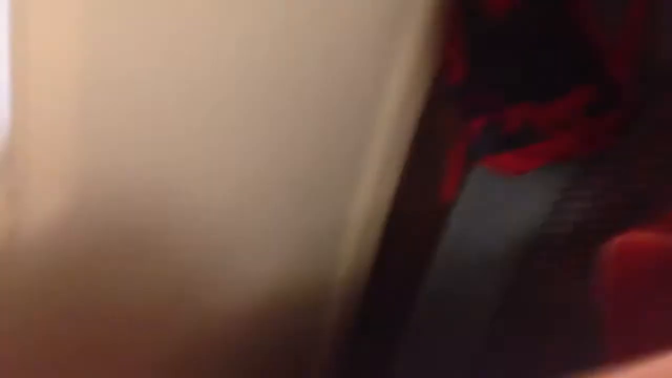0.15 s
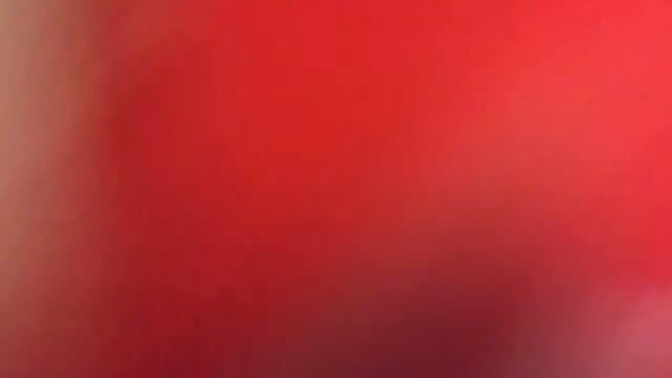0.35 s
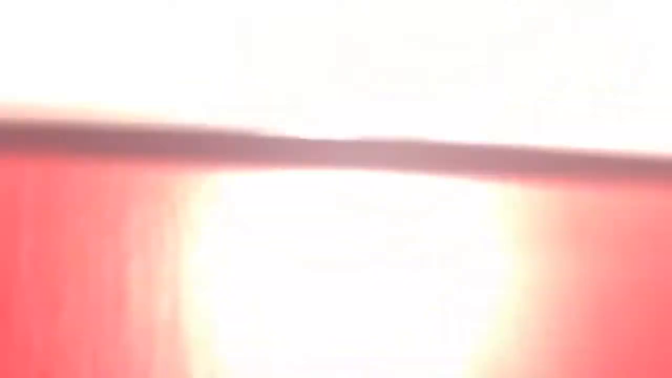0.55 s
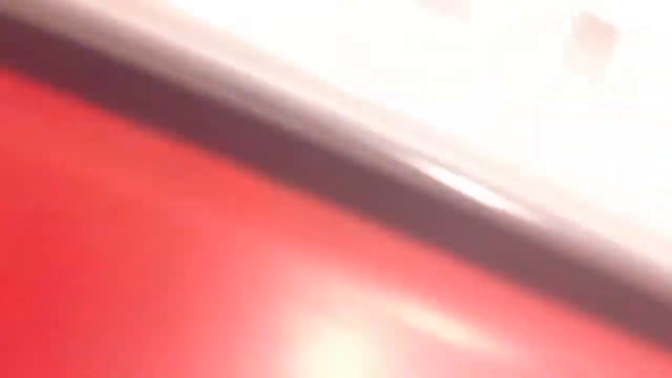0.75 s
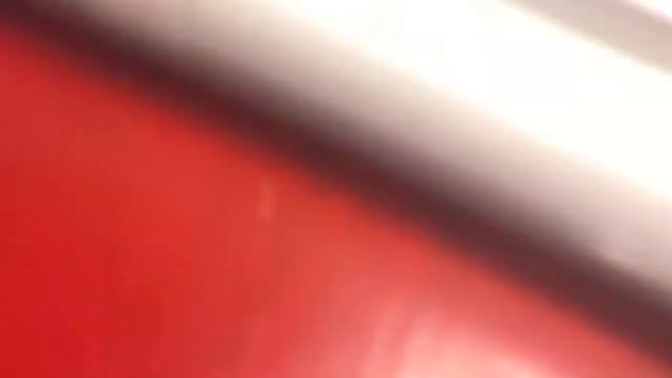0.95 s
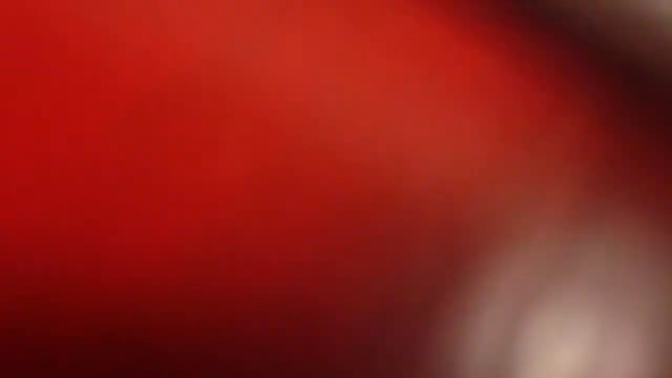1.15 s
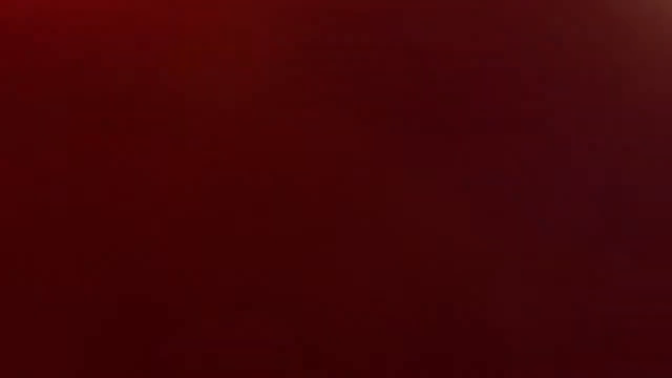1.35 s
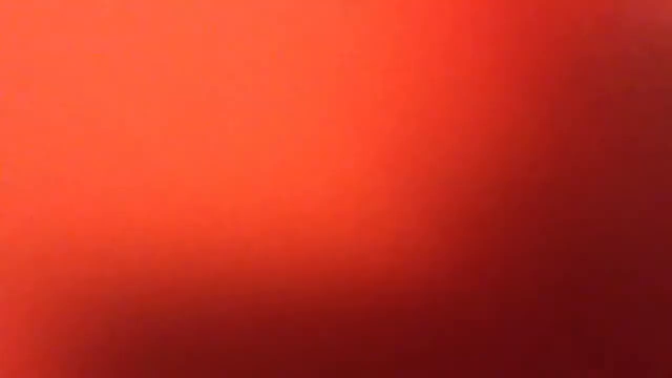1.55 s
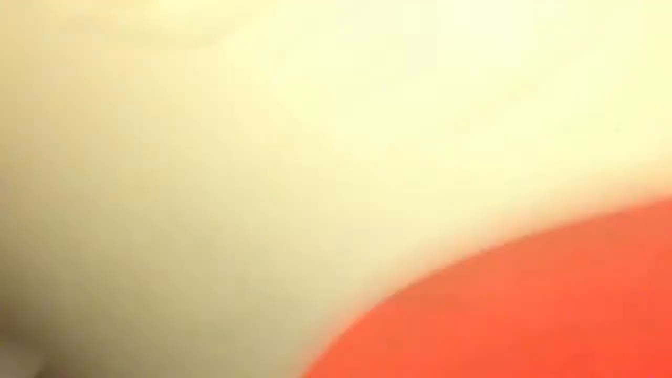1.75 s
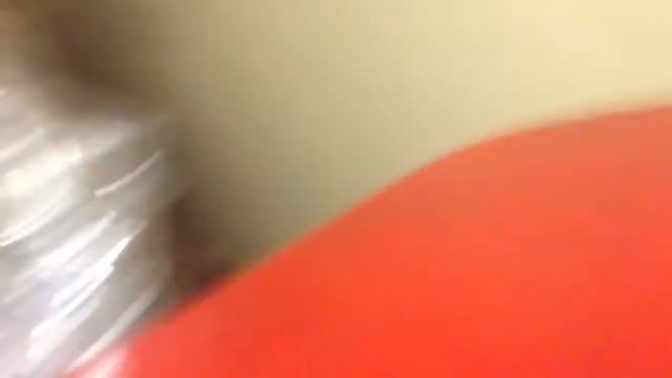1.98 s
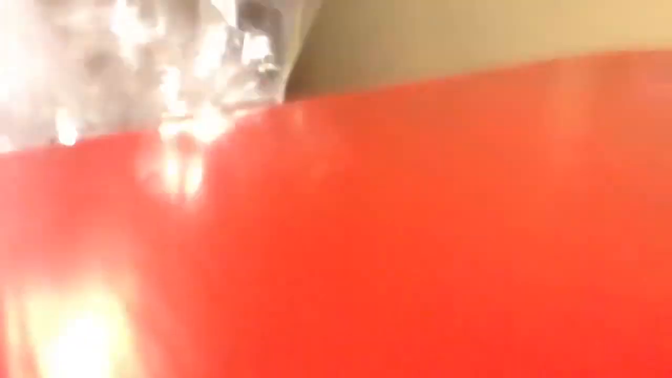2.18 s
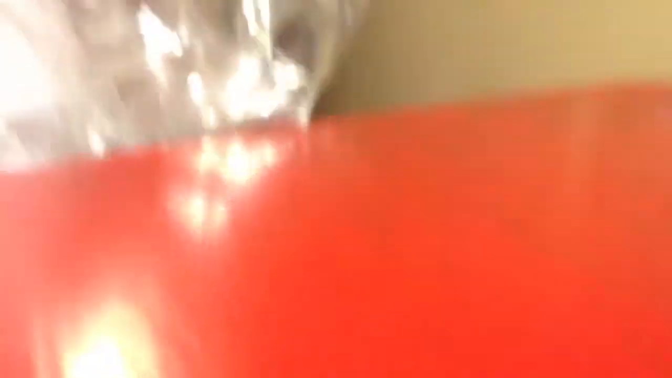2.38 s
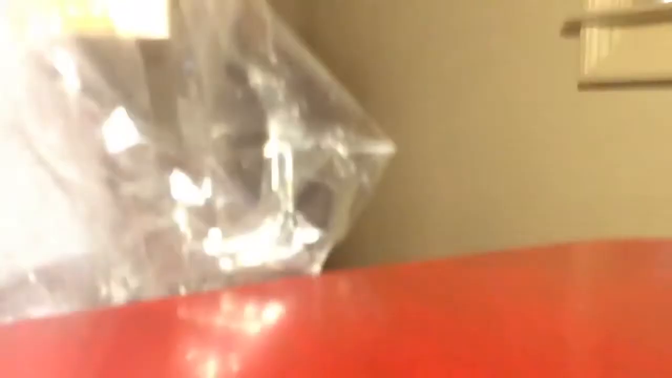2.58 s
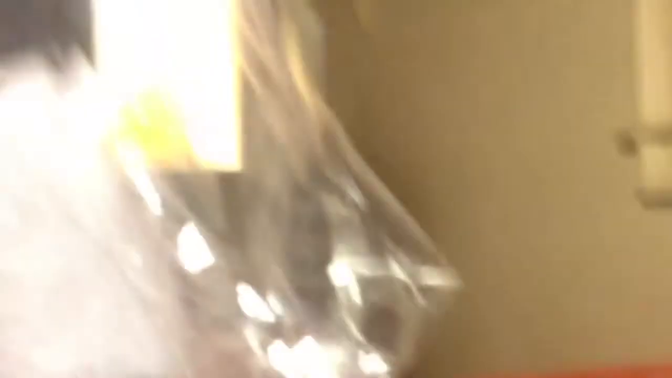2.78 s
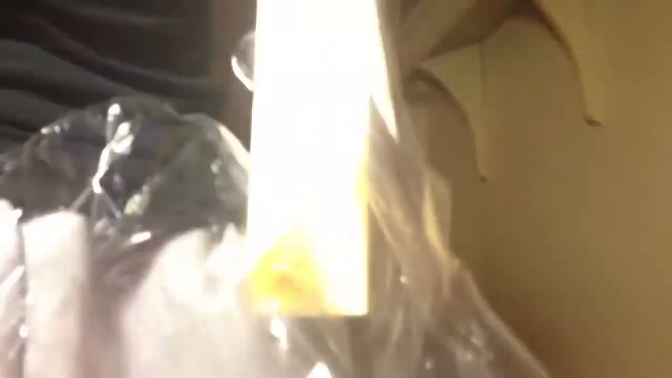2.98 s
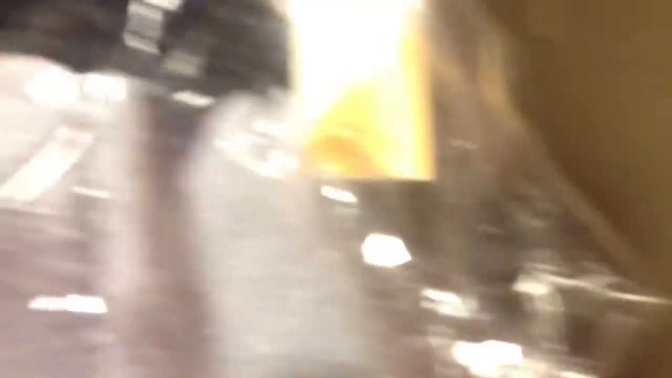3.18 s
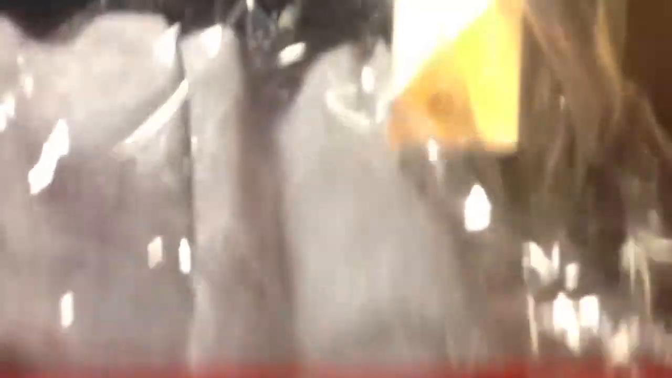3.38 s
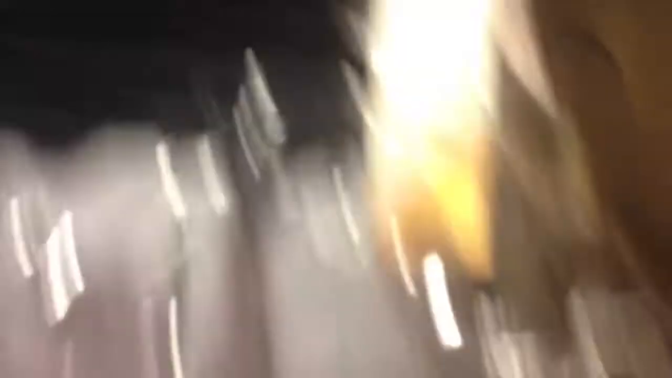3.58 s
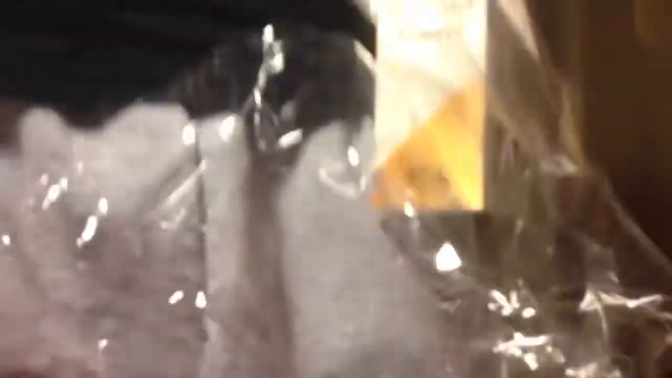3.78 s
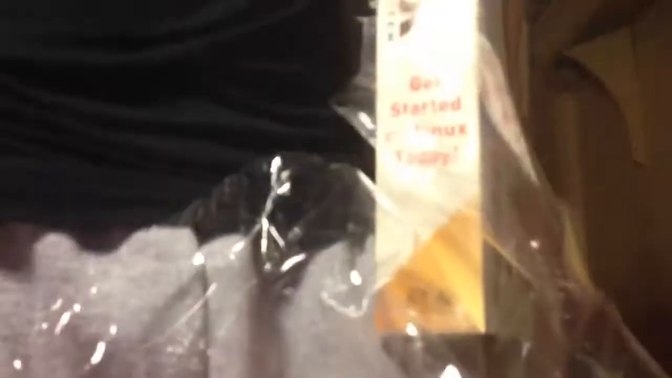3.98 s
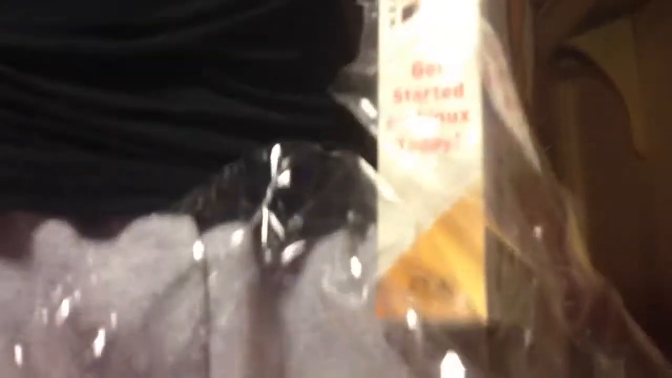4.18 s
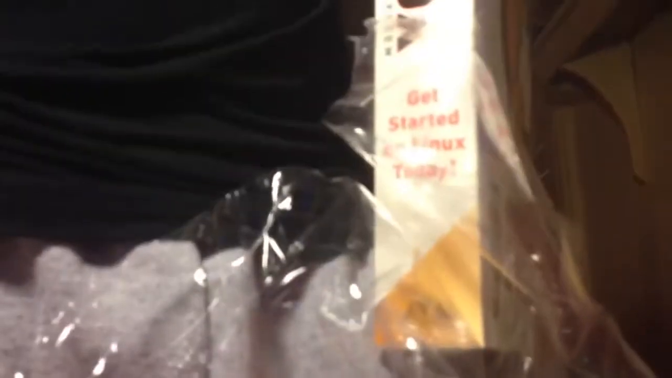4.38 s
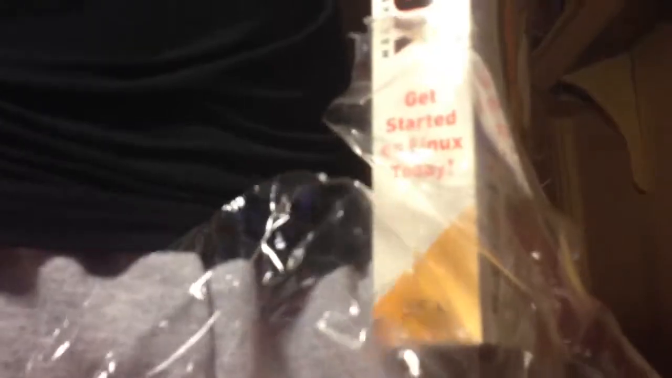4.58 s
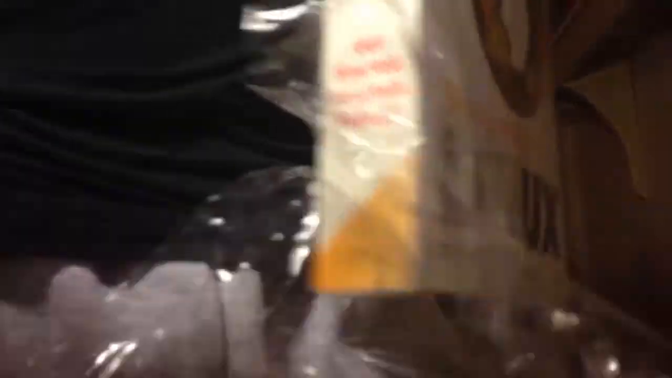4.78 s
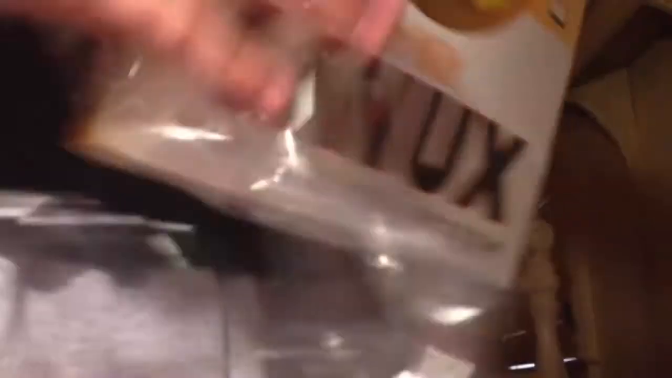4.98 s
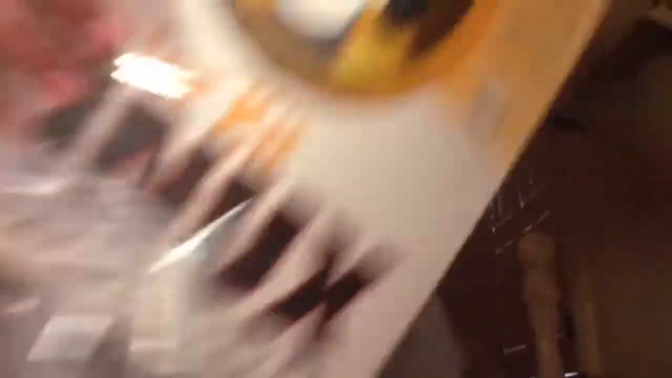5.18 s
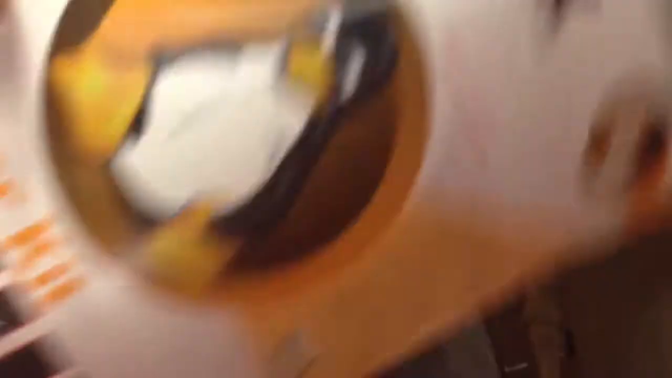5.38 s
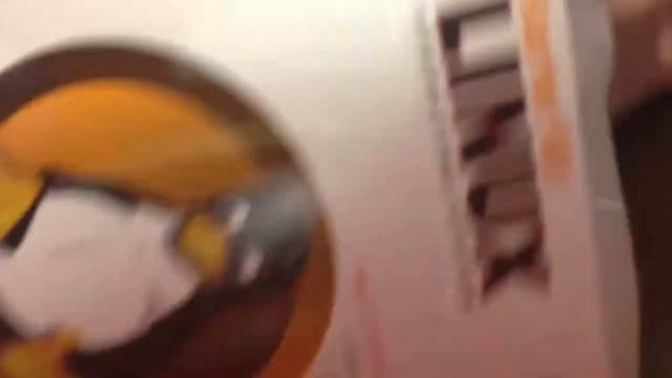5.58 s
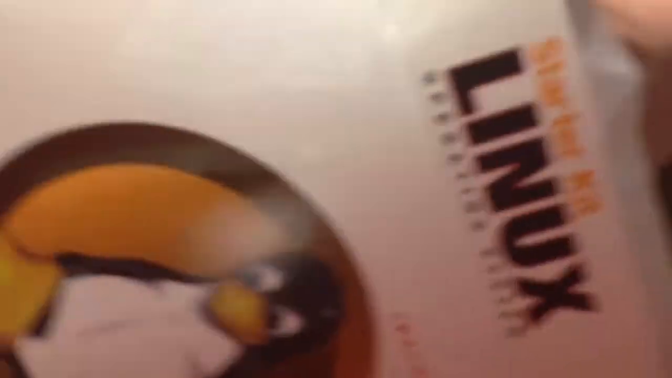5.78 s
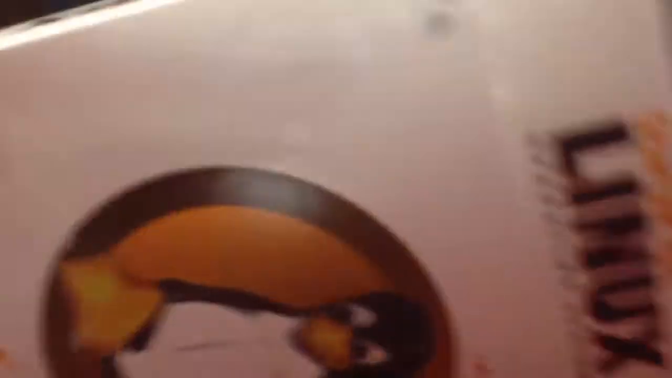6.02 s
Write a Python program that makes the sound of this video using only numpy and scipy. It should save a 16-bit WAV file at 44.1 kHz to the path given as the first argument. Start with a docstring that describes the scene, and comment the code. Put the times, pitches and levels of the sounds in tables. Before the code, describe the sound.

Everything is very close and dry, in a small quiet room with a soft hiss. At 0 s there is a short clack, scrape and hand rub, then faint crinkling and small plastic ticks until 0.9 s. At 1.03 s comes the loudest blow, a hard low knock with a scrape; at 1.33 s a sharp, bright clack of a hard case. A softer bump follows at 1.88 s, then a strong clattering double hit at 2.1-2.2 s, ringing the hollow desk. It stays nearly still with weak taps, a light clack at 2.76 s, and then a tight group of thumps, scrapes and snaps at 3.58-3.93 s. After a quiet gap, plastic wrap starts crinkling at about 4.75 s, bursts strongest at 5.05 s, and keeps snapping and crackling in uneven pulls, with cardboard rubbing and dull bumps near 5.5 s, to the end at 6 s.

```python
"""Hard knocks, clacks and scrapes right at the microphone, then plastic that crinkles and snaps.
A hand-held camera is bumped and set down on a desk: blows swing its case and ring the hollow desk, edges chatter.
Then a cardboard box is pulled out of clear wrap: noise bursts make the snaps, random impulses the sliding.
A small, quiet room answers faintly with decaying noise, over a soft hush."""
import sys
import numpy as np
from scipy import signal
from scipy.fft import rfft, irfft, next_fast_len
from scipy.io import wavfile
from scipy.ndimage import map_coordinates

SR = 44100
rng = np.random.default_rng(int(sys.argv[2]) if len(sys.argv) > 2 else 0)


def wav_out(sig):
    """Save sig, one row per channel (or a flat mono array), as 16-bit PCM at SR to the path in sys.argv[1]."""
    wavfile.write(sys.argv[1], SR, np.round(np.clip(np.atleast_2d(sig).T, -1, 1) * 32767).astype(np.int16))


N = 266805
AGE = np.arange(SR // 4) / SR  # time since a contact [s]

# Blows on case and desk, before the trims in knocks(): (time [s], low thump level [dB], thump pitch [Hz],
# knock level [dB], knock pitch [Hz], loss per rock [dB])
BLOWS = [(0.037, -35.5, 234, -24.5, 473, 13), (1.034, -12.5, 172, -3, 388, 28),
         (1.058, -20, 218.6, -30.5, 642, 15), (1.303, -33.5, 248, -50, 450, 18),
         (1.328, -28, 319, -14.5, 680, 38), (1.376, -39.5, 307, -40, 726, 2),
         (1.481, -37.5, 285, -50, 520, 13), (1.878, -23.5, 178, -37.5, 609, 22),
         (2.109, -35.5, 248, -15, 622, 26), (2.122, -19.5, 280, -23, 520, 9),
         (2.179, -14, 216, -9, 643, 19), (2.217, -31, 174.4, -38, 720, 9),
         (2.465, -59.5, 221, -54.5, 684, 15.5), (2.648, -55.5, 209, -51, 750, 6.5),
         (2.759, -36.5, 236, -33.5, 614, 17), (2.775, -29, 261.5, -39.5, 475, 5),
         (3.02, -36.5, 228, -55.5, 460, 19), (3.316, -61, 232, -55, 694, 13),
         (3.578, -21.5, 220, -21.5, 510, 22), (3.594, -21.5, 226, -26, 570, 7),
         (3.679, -11, 182, -14, 494, 4.5), (3.812, -29.5, 249, -36, 750, 23),
         (3.921, -29, 186, -39.5, 750, 7), (4.282, -40, 145, -58, 710, 19),
         (5.047, -22.5, 218, -39, 875, 8.5), (5.092, -45.5, 220, -31.5, 1235, 20),
         (5.493, -23, 196, -61, 430, 13), (5.56, -23.5, 199, -25, 537, 4.5),
         (5.991, -31.5, 260, -41, 566, 1.5)]


def amp(db):
    """Decibels to gain."""
    return 10 ** (np.asarray(db) / 20)


def unit(x):
    """Scale to rms 1."""
    return x / np.sqrt(np.mean(x ** 2) + 1e-20)


def sized(x, db):
    """Give a hit the energy of one millisecond at this rms level."""
    return x * amp(db) * np.sqrt(SR / 1000 / (np.sum(x ** 2) + 1e-20))


def along(points, hz):
    """Read (Hz, value) points on a log frequency axis."""
    f, v = np.transpose(points)
    return np.interp(np.log(hz + 1), np.log(f + 1), v)


def curves(rows):
    """One level per sample for each column; -120 dB, practically silent, outside the rows."""
    s, *cols = np.transpose(rows)
    return [np.interp(np.arange(N) / SR, s, c, left=-120, right=-120) for c in cols]


def wobble(rate):
    """A smooth random curve with rate knots a second."""
    knots = rng.standard_normal(int(N * rate / SR) + 4)
    return map_coordinates(knots, [np.arange(N) * rate / SR])


def fade(t60):
    """Exponential decay after a contact, falling 60 dB in t60 seconds."""
    return amp(-60 * AGE / t60)


def filtered(x, response):
    """x times a response given as a function of frequency."""
    m = next_fast_len(len(x) + 8192)
    return irfft(rfft(x, m) * response(np.fft.rfftfreq(m, 1 / SR)), m)[:len(x)]


def resonance(f, hz, width):
    """A causal band-pass with peak gain 1."""
    return 1j * f * width / (hz * hz - f * f + 1j * f * width)


def add(track, s, x):
    """Mix x into the track from time s."""
    start = min(max(round(s * SR), 0), N)
    track[start:start + len(x)] += x[:N - start]


def grains(count, rate, spread_db):
    """Random impulses, rate a second: many small ones and a few large, scaled to rms 1."""
    size = amp(spread_db * np.minimum(rng.exponential(size=count), 4))
    struck = rng.random(count) < rate / SR
    return unit(struck * size * rng.choice([-1, 1], count))


def push(hz, rise):
    """A few swings that build up and die away, quicker for a shorter rise [s]."""
    return (AGE / rise) ** 3 * np.exp(-AGE / rise) * np.sin(2 * np.pi * hz * AGE)


def rocking():
    """Four contacts per blow: the first, then ever softer ones with weaker knocks as the object rocks to rest."""
    rock_s, rock_dull_db = .019, 7  # time between contacts [s]; extra loss of the later knocks [dB]
    contacts = []
    for s, thump_db, thump_hz, knock_db, knock_hz, loss_db in BLOWS:
        for k in range(4):
            dull_db = rock_dull_db * (k > 0)
            contacts.append((s + k * rock_s, thump_db - k * loss_db, thump_hz,
                             knock_db - k * loss_db - dull_db, knock_hz))
    return contacts


def knocks():
    """Each contact swings the case for a few cycles, thumps the desk and leaves its hollow ringing."""
    # Modes of the hollow desk and box, before random scatter: (pitch [Hz], relative level [dB], t60 [s])
    desk_modes = [(138, -0.5, 0.14), (168, -4.5, 0.064), (196, -5, 0.3), (236, 2.5, 0.26),
                  (305, -9.5, 0.18), (430, -8.5, 0.16)]
    panel_db, panel_db_per_oct = -9.5, 7.5  # rattle against a 600 Hz knock; higher knocks rattle it more
    out = np.zeros(N)
    for s, thump_db, thump_hz, knock_db, knock_hz in rocking():
        # the swings start a little early, since they take time to build up
        add(out, s - .0022, sized(push(knock_hz, rise=0.00079), knock_db))
        add(out, s - .004, sized(push(thump_hz, rise=.0021), thump_db - 2.5))

        # the touching faces rattle against two broad panel resonances, filling in the middle of the knock
        rattle = grains(len(AGE), rate=3400, spread_db=4.0) * fade(0.022)
        high_panel = filtered(rattle, lambda f: resonance(f, 690, 520) ** 2)
        low_panel = filtered(rattle, lambda f: resonance(f, 370, 150) ** 2)
        high_panel_db = knock_db + panel_db + panel_db_per_oct * np.log2(knock_hz / 600)
        add(out, s, sized(high_panel, high_panel_db))
        add(out, s - .002, sized(low_panel, thump_db - 10.0))

        ring = np.zeros(len(AGE))
        for hz, db, t60 in desk_modes:
            gain = amp(db + rng.normal(0, 3))
            detuned_hz = hz * (1 + .03 * rng.normal())
            ring += gain * fade(t60) * np.sin(2 * np.pi * detuned_hz * AGE)
        # a harder blow presses on the desk and damps it, so the ring grows half as fast in dB
        add(out, s, sized(ring, 0.5 * thump_db - 28.5))
    return out


def case(f, direct):
    """The modes of the plastic case over a share of unringing sound."""
    # Case modes: (pitch [Hz], width [Hz], level [dB])
    case_modes = [(940, 400, 6.5), (1530, 200, -3.5), (1780, 270, -9), (2022, 91, 0), (2560, 150, -12),
                  (2710, 200, -5), (3150, 120, -8), (4210, 160, -9), (4990, 180, -7), (5500, 63, -15.5),
                  (6200, 95, -14.5), (6430, 120, -17.5), (8150, 500, -8.5), (9840, 220, -13)]
    return direct + sum(amp(db) * resonance(f, hz, width) for hz, width, db in case_modes)


def clacks():
    """A hard edge chatters for a few milliseconds and rings the case."""
    # Hard edges meeting: (time [s], level [dB], brightness [Hz])
    edge_hits = [(0.0155, -27, 4770), (0.161, -35, 3950), (1.325, -7.5, 4276), (1.3746, -24, 2630),
                 (1.3796, -23, 2680), (1.8478, -42, 3180), (1.8825, -28, 3570), (2.109, -24.5, 2551),
                 (2.1769, -11.5, 3175), (2.4133, -43, 3780), (2.469, -54, 3200), (2.672, -52.5, 3420),
                 (2.757, -35, 2870), (2.8487, -38.5, 3730), (3.5758, -36.5, 2800), (3.6071, -25, 2390),
                 (3.6774, -20, 4350), (3.694, -25, 3885), (3.813, -35, 4030), (3.9284, -42.5, 4750),
                 (5.4684, -32, 2800), (5.5473, -29.5, 2050), (5.5573, -32.5, 2170)]
    out = np.zeros(N)
    for s, db, hz in edge_hits:
        build_up = 1.1 - fade(0.017)
        decay = fade(0.013) + amp(-31.5) * fade(0.053)
        chatter = grains(len(AGE), rate=20000, spread_db=5.0) * build_up * decay
        clack = filtered(chatter, lambda f: case(f, direct=0.053) * resonance(f, hz, 1.5 * hz) ** 2)
        add(out, s, sized(clack, db))
    return out


def scrapes():
    """Dragging surfaces catch and slip; the ring of the case colours the slips."""
    # Strokes: (time [s], length [s], level before the stroke's swell [dB], brightness [Hz],
    # width [share of the brightness])
    strokes = [(0.017, 0.035, -31, 1940, 1.9), (0.606, 0.25, -59.5, 3120, 0.16),
               (1.016, 0.053, -39, 377, 0.77), (1.256, 0.11, -52, 2780, 0.76),
               (1.265, 0.14, -50, 296.7, 0.8), (1.378, .05, -50.5, 1780, 0.33), (1.413, .11, -57, 2860, .6),
               (1.868, 0.059, -51, 4000, 1.13), (2.091, 0.084, -50.5, 917, 0.98),
               (2.165, .018, -34.5, 606, 0.61), (2.18, 0.092, -52.5, 890, 0.96),
               (2.75, 0.046, -50, 1450, 0.87), (3.246, 0.091, -60.5, 3250, 0.55),
               (3.344, 0.058, -60.5, 337, 0.096), (3.572, .045, -49, 1500, 1.1),
               (3.662, 0.093, -40.5, 930, 1.1), (4.918, 0.041, -43, 1700, 1.22),
               (4.995, 0.039, -40, 1090, 1.3), (5.04, 0.025, -35, 3600, 2.3), (5.547, .06, -41, 1080, 0.73)]
    out = np.zeros(N)
    for s, length, db, hz, width in strokes:
        slips = grains(len(AGE), rate=7000, spread_db=5.5)
        rasp = filtered(slips, lambda f: case(f, direct=3.9) * resonance(f, hz, width * hz)
                        * resonance(f, 1500, 10000))
        swell = np.abs(np.sin(np.pi * np.minimum(AGE / length, 1))) ** 0.59
        add(out, s, amp(db) * unit(rasp) * swell)
    return out


def snaps():
    """A crease flips over in about a millisecond and the plastic around it shivers."""
    # Single snaps and ticks of plastic, loud and faint: (time [s], level [dB], brightness [Hz])
    single_snaps = [(0.018, -19.5, 8065), (0.252, -44, 6160), (0.3437, -42.5, 6700), (0.3932, -37.5, 4100),
                    (0.434, -30, 7400), (0.444, -27.5, 4560), (0.7793, -43.5, 8200), (0.9006, -33, 5244),
                    (1.0349, -16, 6170), (1.0672, -36, 7500), (1.079, -40, 5970), (1.8917, -34, 6515),
                    (1.9503, -43.5, 4235), (2.1781, -24, 7493), (2.3992, -49.5, 4680),
                    (2.9731, -45.5, 8100), (3.0247, -44, 4900), (3.5148, -54, 5110), (3.5824, -34, 6380),
                    (3.5922, -28.5, 7140), (3.6783, -22, 6910), (3.6864, -27.5, 7470),
                    (3.7131, -21.5, 7445), (3.7287, -29.5, 8810), (3.9948, -36.5, 5232),
                    (4.0832, -43.5, 4630), (4.821, -38, 5440), (4.855, -26, 7760), (4.8783, -30.5, 5980),
                    (4.97, -30, 5700), (5.0262, -24.5, 7280), (5.106, -25, 8470), (5.141, -29, 7190),
                    (5.1595, -26.5, 7400), (5.1994, -24, 6690), (5.264, -26.5, 6560), (5.3877, -33, 6460),
                    (5.4202, -29, 6780), (5.5143, -35, 8290), (5.7365, -36, 6620), (5.803, -30.5, 7700),
                    (5.8177, -29, 8334), (5.8452, -25, 6440)]
    out = np.zeros(N)
    for s, db, hz in single_snaps + random_snaps():
        shiver = amp(-11.5) * fade(0.012) + amp(-23.0) * fade(0.051)
        flip = rng.standard_normal(len(AGE)) * (fade(0.0014) + shiver)
        add(out, s, sized(filtered(flip, lambda f: resonance(f, hz, 1.15 * hz) ** 2), db))
    return out


def random_snaps():
    """Creases give way at random: as the film moves, just after a blow, and now and then by themselves."""
    crease_hz, spread_oct, scatter_db = 5950, 0.56, 4.5  # brightness [Hz], its spread, spread of strength
    give_db = 5.5  # a crease giving way, over the crinkle of the moving film
    jolt_db, jolt_s = -28, 0.019  # shaken loose by a blow: level against its thump [dB], mean delay [s]
    stray_s, stray_db = (1.4, 5.2), -56  # ticking by itself while held: (from, to) [s], level [dB]

    crinkle, _ = friction()
    moving = [(i / SR, 20 * np.log10(crinkle[i]) + give_db) for i in rng.integers(N, size=380)]
    jolted = [(s + jolt_s * wait, thump_db + jolt_db)
              for s, thump_db, *_ in BLOWS for wait in 2 * rng.random(size=2)]
    stray = [(s, stray_db) for s in rng.uniform(*stray_s, size=18)]
    return [(s, db + scatter_db * rng.normal(), crease_hz * 2 ** (spread_oct * rng.normal()))
            for s, db in moving + jolted + stray]


def sliding():
    """Sliding film crackles in clumps over a fine hiss; card and hands rub lower down."""
    # Colour of the film: (frequency [Hz], level [dB per Hz])
    wrap_colour = [(710, -45.5), (1200, -8), (1550, -2), (2190, -4), (2460, -5), (3110, -3.5), (3610, -4),
                   (6310, -4.5), (12400, -8), (15500, -12.5)]
    # Colour of the rubbing card: (frequency [Hz], level [dB per Hz])
    card_colour = [(53, -60), (90, -11.5), (233, 3.5), (374, -1.5), (471, 0.5), (516, -6.5), (592, -2),
                   (701, -5), (923, -3.5), (1130, -5.5), (1840, -12.5), (2460, -6), (3500, -13.5),
                   (4550, -39), (7700, -120)]
    busy_db, sparser = -42.5, .55  # crinkle level of the densest creases; how fast they thin out below it

    crinkle, rubbing = friction()
    catching = wobble(55)  # film and card stick and let go together
    clumps = amp(2.4 * catching)

    # slow film crackles in fewer, more separate ticks
    density = np.clip(crinkle / amp(busy_db), .06, 1) ** sparser
    # creases of different sizes each crackle in their own register, in their own little bursts
    creases = np.zeros(N)
    for hz in (2000, 3300, 5260, 7560, 12200):
        bursts = amp(2 * wobble(30))
        ticks = bursts * grains(N, rate=380 * density, spread_db=3.0) / np.sqrt(density)
        creases += filtered(ticks, lambda f: resonance(f, hz, 1.3 * hz))
    hiss = amp(-6) * grains(N, rate=20000, spread_db=4.0)
    crackle = unit(clumps * creases) + hiss
    film = unit(filtered(crackle, lambda f: amp(along(wrap_colour, f))))

    fibres = amp(0.64 * catching + 0.36 * wobble(33)) * grains(N, rate=4400, spread_db=6.0)
    # the card panel has a nasal ring
    card = unit(filtered(fibres, lambda f: amp(along(card_colour, f))
                         * (1 + 0.73 * resonance(f, 1850, 193.3))))
    return crinkle * film + rubbing * card


def friction():
    """Gain of the film's crinkle and of the rubbing; one pull drives both the wrap and the card."""
    # Hands shifting their grip: (time [s], crinkle level [dB], rubbing level [dB])
    hand_moves = [(.05, -57, -41), (.11, -61, -82), (.3, -59.5, -64.5), (.45, -51, -61.5), (.58, -62, -73),
                  (.72, -64, -61), (1.0, -64.5, -69.5), (1.1, -91.5, -92)]
    # The wrap sliding off the box in several pulls: (time [s], crinkle level [dB])
    pull_moves = [(4.55, -77), (4.75, -59.5), (4.84, -55), (4.93, -46), (4.99, -46.5), (5.05, -35),
                  (5.085, -44), (5.2, -41), (5.29, -43.5), (5.36, -52.5), (5.425, -42.5), (5.52, -54),
                  (5.565, -44.5), (5.635, -55), (5.76, -51.5), (5.82, -42.5), (5.93, -53.5), (6.05, -45.5)]
    card_db = -5.5  # card rubbing inside the wrap, against the crinkle
    grip, palm = amp(curves(hand_moves))
    pull, = amp(curves(pull_moves))
    return grip + pull, palm + amp(card_db) * pull


def room(x):
    """The walls' answer: noise that starts 300 samples late and dies slowest in the bass."""
    # Decay of the small room: (frequency [Hz], t60 [s])
    room_decay = [(150, .35), (400, 0.15), (1500, 0.072), (5000, 0.13), (14000, 0.097)]
    hz, t, z = signal.stft(rng.standard_normal(SR // 2), SR, nperseg=256)
    decay = amp(-60 * t / along(room_decay, hz)[:, None])
    tail = signal.istft(z * decay, SR, nperseg=256)[1]
    echo = np.pad(tail / np.linalg.norm(tail), (300, 0))
    return signal.fftconvolve(x, echo)[:N]


def hush():
    """Still room air and microphone hiss: coloured noise that slowly changes level."""
    # Colour of the still air: (frequency [Hz], level [dB per Hz])
    air_colour = [(40, -48.5), (95, -17.5), (190, -17.5), (320, -10.5), (480, -14.5), (660, -15.5),
                  (1100, -18.5), (2000, -23), (3200, -20), (6500, -25), (12000, -26.5), (15500, -26.5)]
    # Course of the hush: (time [s], level [dB])
    air_level = [(0, -58), (1.1, -65.5), (1.6, -68.5), (2.598, -68.5), (3.2, -66.5), (4.1, -63),
                 (4.602, -69), (6.05, -59)]
    level_db = np.interp(np.arange(N) / SR, *np.transpose(air_level))
    air = filtered(rng.standard_normal(N), lambda f: amp(along(air_colour, f)))
    return amp(level_db) * unit(air)


def scene():
    """Contacts and plastic are nearly dry, with a faint send to the room, over the hush."""
    contacts = knocks() + clacks() + scrapes()
    plastic = snaps() + sliding()
    reflections = room(amp(-21) * contacts + amp(-23.5) * plastic)
    return (contacts + plastic + reflections + hush())[None]


def record(dry):
    """The camera cuts the deep bass, softens the top octave and keeps nothing above its band limit."""
    top_hz = 15600
    thin = signal.sosfilt(signal.butter(3, 105, "highpass", fs=SR, output="sos"), dry[0])
    soft = signal.sosfilt(signal.butter(1, 14000, fs=SR, output="sos"), thin)
    return filtered(soft, lambda f: f < top_hz)[None]


dry = scene()
out = record(dry)
wav_out(out)
```